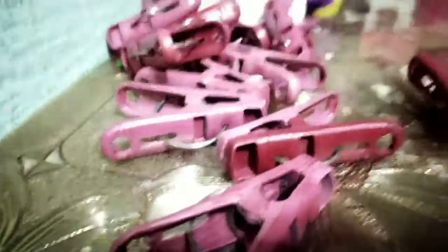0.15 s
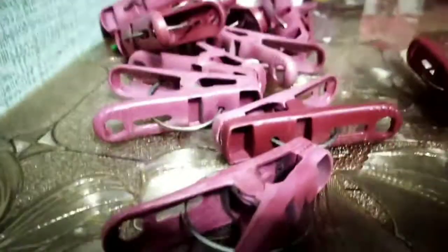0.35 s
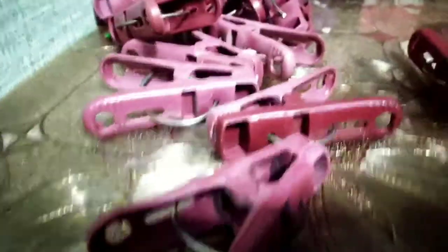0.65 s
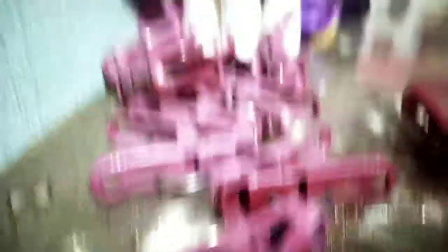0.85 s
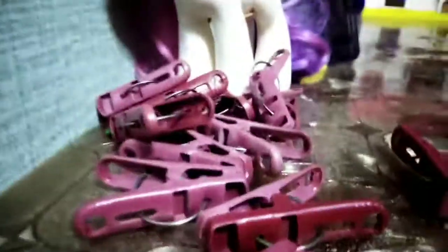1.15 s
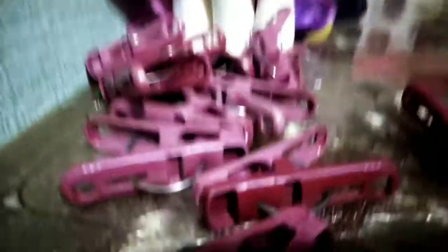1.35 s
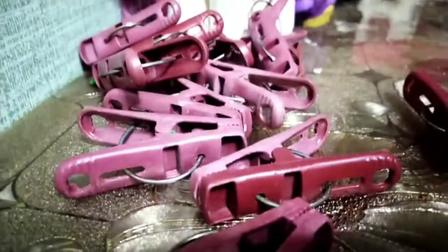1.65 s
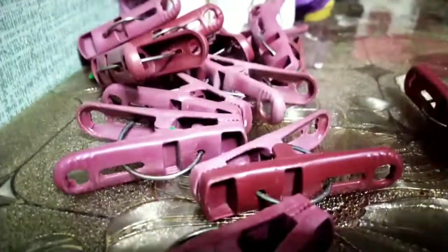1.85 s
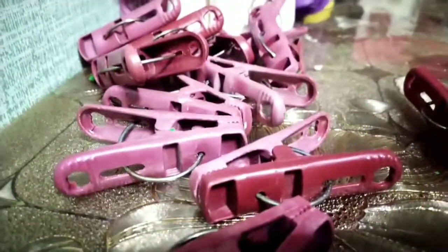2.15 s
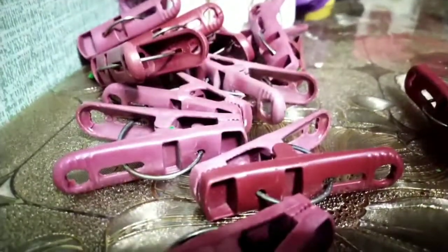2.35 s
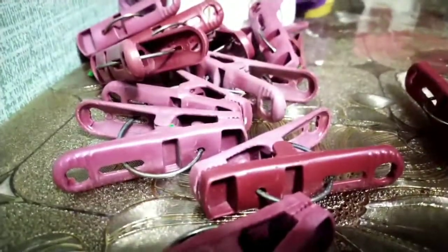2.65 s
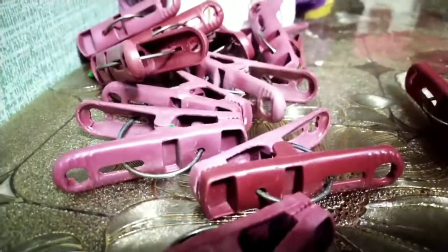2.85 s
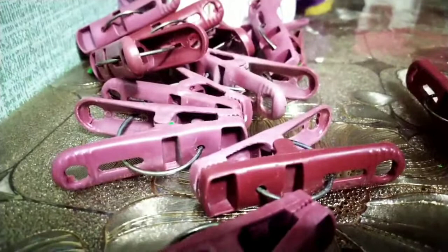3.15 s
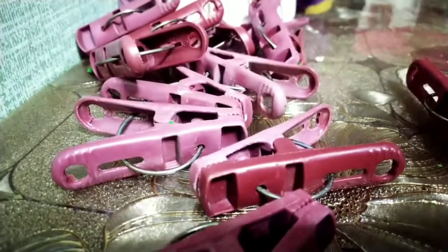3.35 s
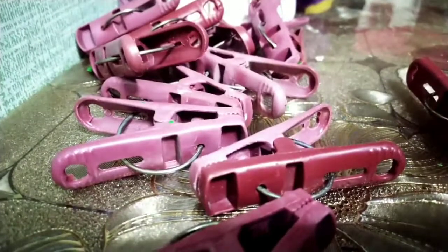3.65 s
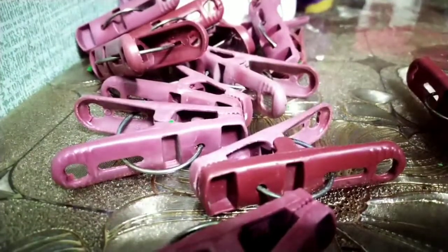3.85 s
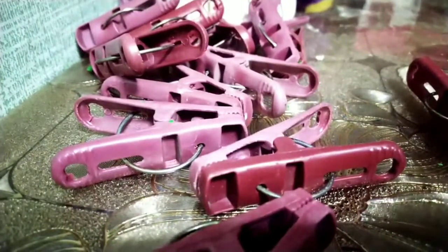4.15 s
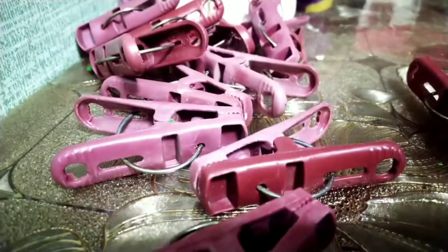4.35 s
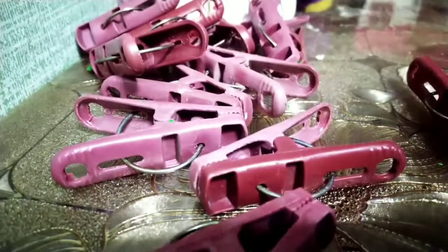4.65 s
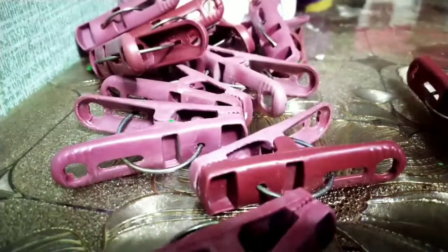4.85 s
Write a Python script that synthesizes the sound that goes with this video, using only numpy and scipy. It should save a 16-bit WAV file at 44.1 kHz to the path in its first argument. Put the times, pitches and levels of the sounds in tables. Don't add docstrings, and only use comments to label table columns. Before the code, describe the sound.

A quiet room with a faint low mains hum around 120 Hz, heard through a handheld phone. From the start a palm rubs softly on the left, with a hollow, breathy colour that wavers; the right side carries thin hiss. A tiny plastic pin ticks at 0.4 s, with drier bright ticks around 1.3 to 1.4 s. At 1.75 s several pins rattle briefly, crisp and high. Around 2.2 s fingers tap the case in a rapid cluster, ending in the loudest event, a hard snappy knock on the left. Pins clack at 2.8 s. From 3.6 to 4.1 s the shifting grip gives deep dull thumps on the left. Faint muffled thuds sit in the background throughout. After a quieter gap, sharp clacks at 4.9 s lean right, with a last low bump. Noise suppression opens after each sound and closes unevenly, leaving watery patches of hiss.

```python
import sys
import numpy as np
from scipy import signal
from scipy.fft import rfft, irfft
from scipy.io import wavfile
from scipy.ndimage import uniform_filter1d, minimum_filter1d

SR = 44100
rng = np.random.default_rng(int(sys.argv[2]) if len(sys.argv) > 2 else 0)


def to_wav(s):
    ch = np.atleast_2d(s).T
    pcm = np.round(np.clip(ch, -1, 1) * 32767)
    wavfile.write(sys.argv[1], SR, pcm.astype(np.int16))


def volts_from_db(level):
    exponent = np.asarray(level, float) / 20
    return 10 ** exponent


N = 220676

# start_s, left_db, right_db, pitch_hz, rattle_s
TICKS = [(.357, -32, -60, 9900, 0.0038), (1.2558, -27, -55, 4650, 0.0008), (1.2558, -42, -29, 8600, 0.0034),
         (1.2872, -21, -72, 3200, 0.0003), (1.4283, -36, -23, 9850, 0.00028),
         (1.7405, -18, -22, 5750, 0.002), (1.745, -36, -40, 3200, .03), (1.746, -21, -33, 5700, .0025),
         (1.7505, -22, -27, 5850, 0.0068), (1.754, -22, -28, 5850, 0.0075),
         (1.7585, -24.5, -36, 5830, 0.007), (1.805, -40, -30, 5200, 0.0016),
         (1.804, -34.5, -39, 5400, 0.026), (1.824, -36.5, -39, 3410, 0.038),
         (2.6305, -37, -46, 3700, 0.007), (.375, -40, -70, 10100, .065), (3.64, -45, -70, 10400, .065),
         (2.804, -39, -45, 10400, .05), (4.92, -38, -50, 10500, .05), (4.9, -40, -38, 2250, .04),
         (3.0958, -56, -34, 8660, 0.0034), (3.708, -57, -32, 9400, 0.00096),
         (4.9162, -36, -10.5, 9460, 0.00061), (4.9162, -27, -42, 10500, 0.0034),
         (4.9162, -34, -40, 8600, .002), (4.9243, -29, -39, 10200, .0008), (4.8935, -34.5, -33, 2200, .008),
         (4.904, -34, -34.5, 3520, 0.01), (2.7975, -34, -29, 8260, 0.0018),
         (2.7985, -40, -34, 5600, 0.0035), (3.625, -48.5, -67, 2310, 0.058), (3.66, -53, -68, 2310, .059),
         (3.69, -52, -71, 2200, 0.038), (3.54, -38, -61, 7800, 0.0065)]
# start_s, left_db, right_db, pitch_hz, rattle_s
CLACKS = [(.355, -29, -72, 3420, 0.0081), (1.7405, -35, -30, 8600, 0.0056), (1.752, -38, -30, 8560, 0.014),
          (2.7972, -22, -20.5, 9900, 0.0016), (2.7982, -23.5, -28, 3020, 0.0038),
          (2.799, -27, -49, 1860, 0.013), (2.8122, -36, -31, 8950, 0.0011),
          (2.8135, -33, -35, 2000, 0.0056), (3.54, -44.5, -65, 3930, 0.008), (3.8, -64, -48, 2120, 0.035),
          (4.215, -66.5, -51, 2640, 0.022), (4.894, -32, -22, 5100, 0.003),
          (4.9162, -45, -23, 3270, 0.00021)]
# pitch_hz, level_db, fade_60db_s
PIN_TONES = [(1480, -1, 0.013), (2200, 2.5, 0.025), (3100, -27, 0.0009), (3100, 2.5, 0.0042),
             (4080, 6.5, 0.0018), (5560, -1, 0.0025), (7600, 0, 0.0014), (8300, 3, 0.0027),
             (9900, -3.5, 0.018), (13600, -10, 0.0024)]
TICK_REST_DB, CLACK_REST_DB = -14.5, 0.5
PIN_LOW_HZ, PIN_TOP_HZ = 1500, 11500
SCATTER_DB, SCATTER_FADE_S, SCATTER_LOW_HZ, SCATTER_HIGH_HZ = -21.5, 0.072, 1920, 7100

# start_s, level_db, snap_db
KNOCKS = [
    (2.1585, -66, 8),
    (2.1732, -23, -10),
    (2.1863, -32.5, 7),
    (2.1954, -3.5, 0),
]
# pitch_hz, level_db, fade_60db_s
CASE_TONES = [(2780, 13, 0.0028), (1404, 6.5, 0.00015), (5100, -12, 0.0025), (9000, -8, 0.0054)]
PUSH_HZ, PUSH_DB, PUSH_FADE_S = 170, -6, 0.023
PUSH_DELAY_S, CONTACT_S = 0.0008, 0.00011

# start_s, left_db, right_db, pitch_hz, length_s
THUMPS = [
    (1.953, -41, -29, 356, 0.0059),
    (3.644, -18, -66, 170, 0.019),
    (3.69, -26, -63, 245, 0.03),
    (3.706, -29, -66, 115, 0.061),
    (4.104, -20.5, -55.5, 101, 0.023),
    (4.9745, -34, -67, 95, 0.022),
]
# start_s, left_db, right_db, pitch_hz, length_s
THUDS = [
    (1.368, -44.5, -52, 236, 0.056),
    (1.523, -58, -49.5, 455, 0.046),
    (1.691, -51.5, -46.5, 450, 0.082),
    (2.657, -57, -50.5, 451, 0.063),
    (3.037, -63, -46.5, 498, 0.022),
    (3.21, -54, -38.5, 438, 0.067),
    (3.595, -63, -50.5, 458, 0.046),
    (4.565, -42.5, -48, 238, 0.057),
    (4.915, -54, -48, 703, 0.039),
]
# start_s, left_db, right_db, pitch_hz, length_s
SCUFFS = [
    (.358, -33, -59, 483, .02),
    (2.163, -32, -64, 537, .021),
    (2.25, -39, -70.5, 430, .09),
]
THUMP_ROUGH, THUD_ROUGH, SCUFF_ROUGH = 0.34, 0.47, 1.05
BUMP_SUDDEN = 1.8

# start_s, pressure_db, brightness_db
RUB = [(0, -50.5, -5), (.08, -55, -27), (.24, -58, -17), (.57, -61.5, -3), (.7, -71, -3), (.84, -57, -1),
       (.92, -71, 0), (1.14, -56.5, 0), (1.55, -58.5, 0), (1.75, -48, -4.5), (2.1, -50, -6),
       (2.75, -53.5, -5), (3.02, -53, -17), (3.41, -51, -21.5), (3.5, -63, -28), (3.9, -70.5, -3),
       (4.0, -69, 0), (5, -70.5, 5)]
RUB_LOW_DB, CAVITY_SHARE = -12, 0.1974
# start_s, pitch_hz, level_db
CAVITY = [(0, 802, -72), (.1, 817, -53), (.21, 855, -61.5), (.36, 776, -49.5), (.57, 860, -62.5),
          (.76, 870, -51.5), (.9, 873, -52), (1.0, 810, -50.5), (1.14, 730, -79.5), (1.218, 790, -51.5),
          (1.46, 727, -59), (1.598, 847, -56), (2.25, 815, -50), (2.51, 826, -61.5), (2.64, 887, -54),
          (2.767, 800, -63.5), (3.05, 800, -55), (3.5, 850, -65), (3.9, 814, -66), (5, 709, -65)]
# pitch_hz, level_db_per_hz
LEFT_COLOUR = [(420, -31.5), (680, 6), (830, 19.5), (980, -15.5), (1400, -16), (2000, -11.5), (3300, -3.5),
               (4100, -1), (4450, -20), (5100, -9.5), (6200, 8.5), (8000, 11.5), (8900, 0), (9500, -15.5),
               (10400, -20), (11800, -24.5), (12400, -19), (14300, -20)]
RIGHT_COLOUR = [(420, 4.5), (600, -9), (1100, 8), (1600, -4), (3200, -16.5), (4200, -17.5), (5300, -2.5),
                (6200, -13.5), (7500, -6.5), (8800, -1), (10000, 4), (11600, -8), (12600, -15.5),
                (14400, -26.5)]
LEFT_EDGES_HZ = [420, 1150, 5200, 9200, 14400]
RIGHT_EDGES_HZ = [330, 1650, 6300, 12300, 14800]
# cavity_db, low_mid_db, high_mid_db, top_db
PATCHY_DB = [
    [3.8, 7.5, 4.5, 6],
    [8, 8, .8, 6],
]
# cavity_db, low_mid_db, high_mid_db, top_db
OPEN_DB = [
    [-36.5, -43, -50.5, -43.5],
    [-45, -43, -39.5, -27],
]
# start_s, low_mid_db, brightness_db, rise_s
LEFT_OPENS = [(0.201, -51, -17, 0.13), (0.366, -46.5, 5.5, 0.094), (0.661, -55.5, -17, 0.051),
              (0.964, -53.5, 9, 0.048), (1.287, -48.5, -1, 0.049), (1.44, -73.5, 26, .02),
              (1.75, -46, 3, 0.023), (2.099, -46.5, -12, 0.058), (2.201, -42, -0.5, 0.045),
              (2.634, -50.5, -8, 0.065), (2.809, -47.5, 3, 0.075), (3.664, -62, 14, 0.11),
              (4.902, -47, -1, 0.012)]
# start_s, low_mid_db, brightness_db, rise_s
RIGHT_OPENS = [
    (.399, -78, 14, 0.036),
    (1.262, -63, -21, 0.14),
    (1.437, -82.5, 27, .02),
    (1.753, -49, -7.5, 0.015),
    (1.956, -58.5, -20, 0.25),
    (2.669, -63, -4, 0.097),
    (2.804, -48, -11, 0.026),
    (3.133, -66, -2, .06),
    (3.675, -56, -1.5, 0.1),
    (4.905, -47, -9, 0.021),
]
# low_mid_db_per_s, high_mid_db_per_s, top_db_per_s
CLOSE_DB_PER_S = [
    [83, 120, 170],
    [109.4, 120, 150],
]
# brightness_share, offset_db
MIDDLE = [(0.501, -1.5), (.9, 11)]
# cavity_leak_db, low_mid_db, hiss_db, top_db
RIGHT_REST_DB = [-63.5, -71.5, -50.5, -90.5]
RIGHT_LEAK = 0.52
WAKE_S, WAKE_DB = 3.55, 20
RISE_DB = 20

# start_s, rumble_db, boom_db, hold_s
LEFT_GRIPS = [(0.356, -56, -58, 0.0082), (0.85, -52, -81, 0.4), (1.339, -51, -53.5, .02),
              (1.495, -54.5, -83, 0.24), (1.958, -75, -46, 0.009), (2.191, -31.5, -35, 0.0093),
              (2.27, -54, -44.5, 0.063), (3.116, -50, -78, .02), (3.2, -66, -55.5, 0.027),
              (3.437, -50, -84, 0.16), (3.639, -32, -51, 0.071), (3.789, -50, -46, 0.016),
              (3.86, -47.5, -84, 0.2), (4.105, -25.5, -75, 0.0054), (4.18, -48, -62.5, 0.077),
              (4.557, -49.5, -58.5, .03), (4.765, -44.5, -83, .02), (4.994, -57, -76, .03)]
# start_s, rumble_db, hold_s
RIGHT_GRIPS = [
    (0, -86, .2),
    (.324, -55, 0.022),
    (0.69, -66, 0.015),
    (1.366, -69, .03),
    (2.35, -55, 0.38),
    (2.972, -50, 0.016),
    (3.205, -59, 0.029),
    (4.037, -53, 0.032),
    (4.977, -68, 0.045),
]
GRIP_RISE_S = 0.049
GRIP_REST_DB, GRIP_FALL_DB_PER_S = [-59, -85, -81], [237.5, 171, 158]

# pitch_hz, level_db, left_minus_right_db
HUM = [(120.2, 4.5, 1), (242, -15, -0.5), (353, -24, 2)]
# start_s, level_db
HUM_LEVEL = [(0, -55), (1.36, -56), (1.77, -57.5), (1.96, -60.5), (2.1, -57.5), (2.2, -65), (2.35, -54),
             (2.7, -57.5), (3.15, -56.5), (3.4, -59.5), (3.58, -56), (3.7, -62), (3.8, -52), (4.02, -57),
             (4.18, -51.5), (4.49, -61.5), (4.58, -58.5), (5, -58.5)]
# pitch_hz, start_s, end_s, level_db
DRONE = (71, .1, .78, -54)
# pitch_hz, level_db_per_hz
ROOM = [(40, -105), (70, -91.5), (140, -94), (250, -96.5), (420, -104), (1200, -112), (2000, -114),
        (6000, -116), (7500, -126), (12000, -131), (13000, -160)]

HOP = 256
MIC_LOW_HZ, MIC_HIGH_HZ, EDGE_HZ = 62, 14100, 15500
CELL_BINS, CELL_FRAMES, WAVER_DB = 3, 11, 4.5
STRUCK_DB = 3
SHUT_DB, SHUT_HZ = -124, 1200
MASK_DB = -16
GATE_DB, MARGIN_DB = 0.8, 1.5


def evened(x):
    return x / np.sqrt(np.mean(x ** 2) + 1e-20)


def band(x, lo_hz, hi_hz):
    return evened(signal.sosfilt(signal.butter(3, [lo_hz, hi_hz], "band", fs=SR, output="sos"), x))


def modes(table, t):
    return sum(volts_from_db(db - 60 * t / fade_s) * np.sin(2 * np.pi * hz * t) for hz, db, fade_s in table)


def read(points, hz):
    f, value = np.transpose(points)
    return np.interp(np.log(hz + 1), np.log(f + 1), value)


def follow(rows):
    s, *columns = np.transpose(rows)
    return np.array([np.interp(np.arange(N) / SR, s, column) for column in columns])


def swells(rest_db, s, db, rise, hold, fall_db_per_s):
    s, db, hold = [np.reshape(x, (-1, 1)) for x in (s, db, hold)]
    t = np.arange(0, N + 64, 64) / SR - s
    before_db = -t * RISE_DB / np.reshape(abs(rise) + 1e-3, (-1, 1))
    after_db = (t - hold) * fall_db_per_s
    below_db = np.maximum(np.maximum(before_db, after_db), 0)
    power = (volts_from_db(db - below_db) ** 2).sum(0)
    power = np.interp(np.arange(N), np.arange(len(power)) * 64, power)
    return np.sqrt(volts_from_db(rest_db) ** 2 + power)


def add(mix, s, sound):
    part = mix[:, round(s * SR):][:, :sound.shape[1]]
    part += sound[:, :part.shape[1]]


def click(left_db, right_db, hz, rattle_s, rest_db):
    t = np.arange(3000) / SR
    ring = modes([(hz, 0, 16 / hz), (hz * 1.166, -5, 12 / hz)], t)
    ring = ring + volts_from_db(rest_db) * modes(PIN_TONES, t)
    common = rng.standard_normal(3000)
    own, scatter = rng.standard_normal((2, 2, 3000))
    hits = (common + own) * np.exp(-2.2 * t / rattle_s) * np.minimum(t / (0.43 * rattle_s), 1)
    sound = signal.fftconvolve(hits, ring[None], axes=1)[:, :3000]
    low_hz = max(PIN_LOW_HZ, 0.82 * hz)
    sound = signal.sosfilt(signal.butter(6, low_hz, "high", fs=SR, output="sos"), sound)
    sound = signal.sosfilt(signal.butter(4, PIN_TOP_HZ, fs=SR, output="sos"), sound)
    tail = band(scatter, SCATTER_LOW_HZ, SCATTER_HIGH_HZ)
    tail = tail * volts_from_db(SCATTER_DB + rest_db - 60 * t / SCATTER_FADE_S)
    return (sound / abs(sound).max(1, keepdims=True) + tail) * volts_from_db([[left_db], [right_db]])


def knock(db, snap_db):
    t = np.arange(2500) / SR
    push = modes([(PUSH_HZ, PUSH_DB, PUSH_FADE_S)], np.maximum(t - PUSH_DELAY_S, 0))
    buzz = band(rng.standard_normal(2500), 480, 5900) * volts_from_db(-19.5 - 60 * t / 0.053)
    blow = np.exp(-((t[:40] - t[20]) / CONTACT_S) ** 2)
    snap = np.convolve(modes(CASE_TONES[:2], t), blow / blow.sum())[:2500]
    snap = snap + modes(CASE_TONES[2:], t)
    return np.outer(volts_from_db([db, db - 58.0]), push - volts_from_db(snap_db) * (snap + buzz))


def bump(left_db, right_db, hz, length_s, rough):
    t = np.arange(-length_s, length_s, 1 / SR)
    noise = band(rng.standard_normal(8000), hz / 1.42, hz * 1.2)[-len(t):]
    rough = np.clip(rough, 0, 1)
    wave = 0.43 * rough * noise - (1 - rough) * np.cos(2 * np.pi * hz * t)
    speed = 1.6 * np.where(t < 0, BUMP_SUDDEN, 1)
    return np.outer(volts_from_db([left_db, right_db]), wave * np.exp(-(speed * t / length_s) ** 2))


def bands(rest_db, opens, middle, close_db_per_s):
    s, db, bright_db, rise = np.transpose(opens)
    share, offset_db = middle
    peaks_db = [db, db + share * bright_db + offset_db, db + bright_db]
    gains = [volts_from_db(rest_db[0])]
    for rest, peak_db, close in zip(rest_db[1:], peaks_db, close_db_per_s):
        gains.append(swells(rest, s, peak_db, rise, 0, close))
    return gains


def port(gains, colour, edges, patchy_db, open_db, cavity):
    size = 4 * HOP
    frames, hz = N // HOP + 9, np.fft.rfftfreq(size, 1 / SR)
    a, b, patches = rng.standard_normal((frames, len(hz), 3)).T
    patches = uniform_filter1d(patches, size=4, axis=0)
    patches = evened(uniform_filter1d(uniform_filter1d(patches, size=12), size=6))
    hz = hz[:, None]
    cavity_hz = np.interp(np.arange(frames) * HOP / SR, *np.transpose(cavity))
    shifted_hz = np.where(hz < edges[1], hz * cavity[0][1] / cavity_hz, hz)
    out = np.zeros(N)
    for k, gain in enumerate(gains):
        level_db = 20 * np.log10(np.resize(gain[::HOP], frames))
        shut = np.clip((open_db[k] - level_db) / 12, 0.15, 1)
        depth_db = patchy_db[k] * shut ** 2
        blobs = volts_from_db(depth_db * patches - depth_db ** 2 * np.log(10) / 20)
        inside = (hz >= edges[k]) * (hz < edges[k + 1])
        shape = volts_from_db(read(colour, shifted_hz) * (0.5664 + 0.27 * shut)) * inside
        shape = shape / np.sqrt((shape ** 2).mean(0))
        z = (a + 1j * b) * shape * blobs * np.sqrt(3 / size)
        out += gain * signal.istft(z, nperseg=size, noverlap=3 * HOP)[1][:N]
    return out


def ports():
    rub_db, bright_db = follow(RUB)
    cavity_db = follow(CAVITY)[1]
    low_rub_db = rub_db + RUB_LOW_DB + CAVITY_SHARE * (cavity_db - rub_db)
    left_db = [cavity_db, low_rub_db, rub_db, rub_db + bright_db]
    leak_db, low_db, hiss_db, top_db = RIGHT_REST_DB
    leak_db = leak_db + RIGHT_LEAK * (cavity_db - cavity_db.mean())
    top_db = top_db + WAKE_DB * (np.arange(N) > WAKE_S * SR)
    right_db = [leak_db, low_db, hiss_db, top_db]
    cavity = [row[:2] for row in CAVITY]
    left = bands(left_db, LEFT_OPENS, MIDDLE[0], CLOSE_DB_PER_S[0])
    right = bands(right_db, RIGHT_OPENS, MIDDLE[1], CLOSE_DB_PER_S[1])
    return [port(left, LEFT_COLOUR, LEFT_EDGES_HZ, PATCHY_DB[0], OPEN_DB[0], cavity),
            port(right, RIGHT_COLOUR, RIGHT_EDGES_HZ, PATCHY_DB[1], OPEN_DB[1], cavity[:1])]


def grips():
    s, rumble_db, boom_db, hold = np.transpose(LEFT_GRIPS)
    right_s, right_db, right_hold = np.transpose(RIGHT_GRIPS)
    rows = zip(GRIP_REST_DB, [s, s, right_s], [rumble_db, boom_db, right_db],
               [hold, hold, right_hold], GRIP_FALL_DB_PER_S)
    return [swells(rest, at, db, GRIP_RISE_S, held, fall) for rest, at, db, held, fall in rows]


def bass():
    t = np.arange(N) / SR
    rumble_l, boom, rumble_r = grips()
    n = rng.standard_normal((6, N))
    left_hand = rumble_l * band(n[0], 40, 129) + boom * band(n[1], 110, 293)
    right_hand = rumble_r * band(n[2], 46, 126.4)
    hum = sum(np.outer(volts_from_db([db + pan_db, db]), np.sin(2 * np.pi * hz * t)) for hz, db, pan_db in HUM)
    hum = np.sqrt(2) * volts_from_db(follow(HUM_LEVEL)[0]) * hum
    hz, start, end, db = DRONE
    fade = np.interp(t, [start - 0.1, start, end - 0.04, end], [0, 1, 1, 0])
    drone = volts_from_db(db) * np.sin(2 * np.pi * hz * t) * fade
    room = volts_from_db(read(ROOM, np.fft.rfftfreq(N, 1 / SR)))
    wash = irfft(rfft(n[3] + n[4:]) * room, N) * np.sqrt(SR / 2)
    return hum + drone + wash + [left_hand, right_hand]


def scene():
    mix = bass() + ports()
    for table, rest_db in ((TICKS, TICK_REST_DB), (CLACKS, CLACK_REST_DB)):
        for s, *row in table:
            add(mix, s, click(*row, rest_db))
    for s, *row in KNOCKS:
        add(mix, s, knock(*row))
    for table, rough in ((THUMPS, THUMP_ROUGH), (THUDS, THUD_ROUGH), (SCUFFS, SCUFF_ROUGH)):
        for s, *row in table:
            add(mix, s - row[3], bump(*row, rough))
    return mix


def shut_cells(x):
    hz, _, z = signal.stft(x, SR, nperseg=1024, noverlap=768, scaling="psd")
    power = uniform_filter1d(uniform_filter1d(abs(z) ** 2, size=4, axis=1), size=12)
    level_db = 10 * np.log10(abs(power) + 1e-20)
    high = hz > SHUT_HZ
    column = high[:, None]
    floor_db = np.maximum(SHUT_DB, read(ROOM, hz) + MARGIN_DB)[:, None]
    neighbour_db = -minimum_filter1d(-level_db * column + 200 * ~column, size=120, axis=1)
    limit_db = np.maximum(floor_db, MASK_DB + neighbour_db)
    steps = rng.standard_normal((len(hz) // CELL_BINS + 1, z.shape[2] // CELL_FRAMES + 1))
    steps = steps.repeat(CELL_BINS, 0).repeat(CELL_FRAMES, 1)
    limit_db = limit_db + WAVER_DB * steps[:len(hz), :z.shape[2]]
    struck = (abs(z[:, high]) ** 2).sum(1) > volts_from_db(STRUCK_DB) ** 2 * power[:, high].sum(1)
    limit_db = limit_db - 60 * struck[:, None]
    keep = np.clip((level_db - limit_db) / GATE_DB, 0.003, 1)
    z = z * np.where(column, keep, 1)
    return signal.istft(z, SR, nperseg=1024, noverlap=768, scaling="psd")[1][:, :N]


def top_cut(x):
    return signal.sosfilt(signal.butter(12, 15590, fs=SR, output="sos"), x)


def record(dry):
    low = signal.sosfilt(signal.butter(4, MIC_LOW_HZ, "high", fs=SR, output="sos"), dry)
    both = signal.sosfilt(signal.butter(10, MIC_HIGH_HZ, fs=SR, output="sos"), low)
    limited = np.clip(shut_cells(both), -1, 1)
    edge = signal.firwin(255, EDGE_HZ, window=("kaiser", 9), fs=SR)
    mix = signal.oaconvolve(limited, edge[None], "same", axes=1)
    return top_cut(mix)


dry = scene()
out = record(dry)
to_wav(out)
```